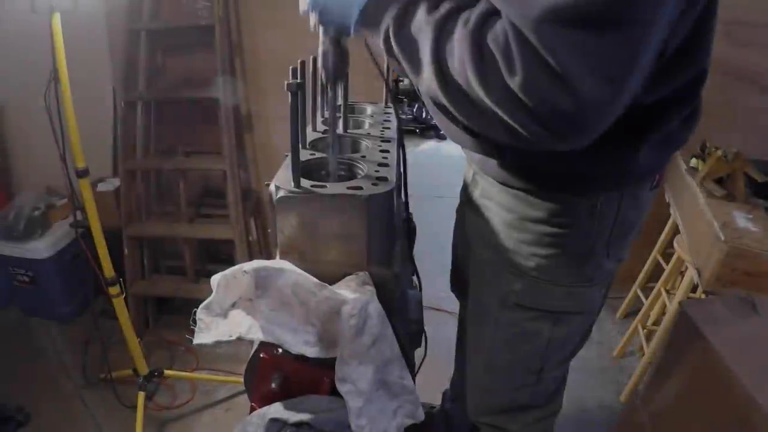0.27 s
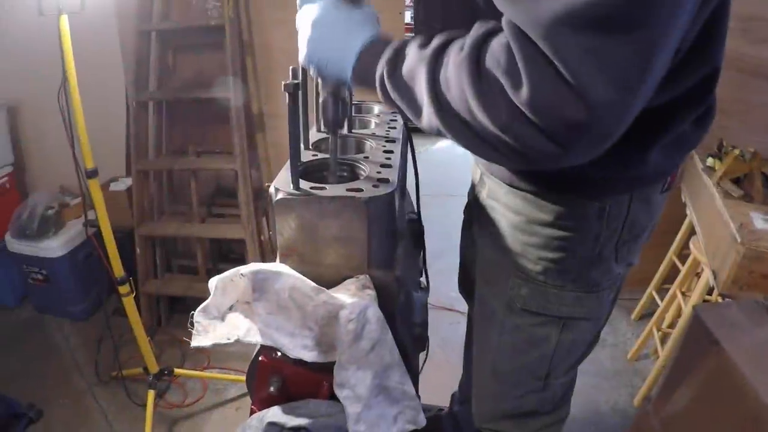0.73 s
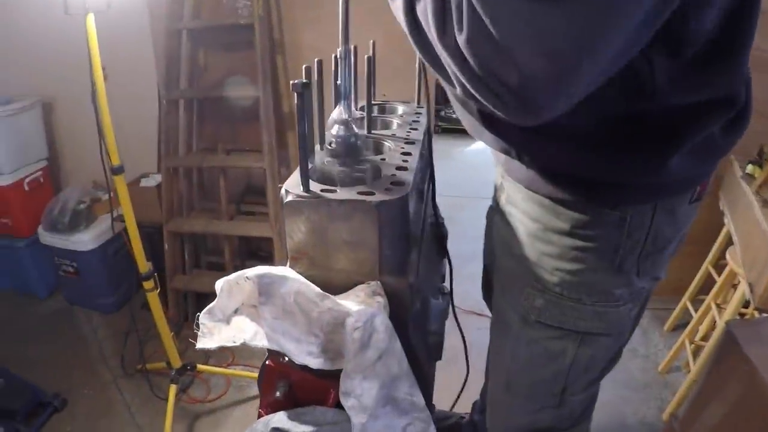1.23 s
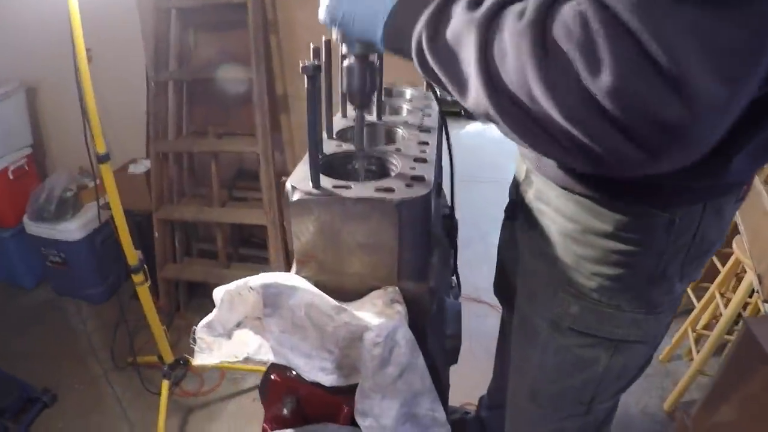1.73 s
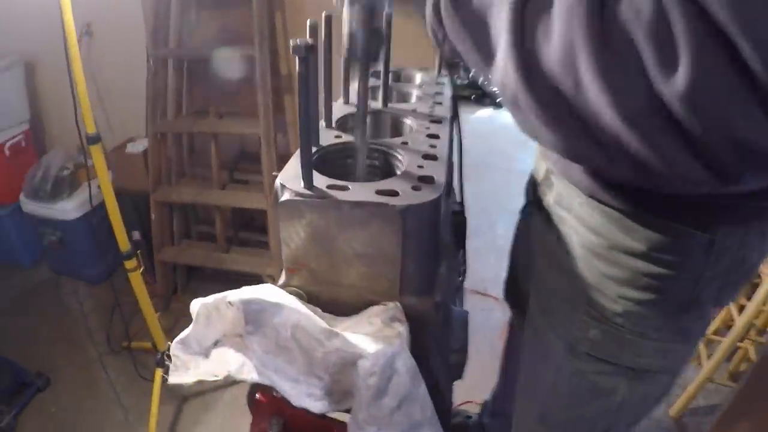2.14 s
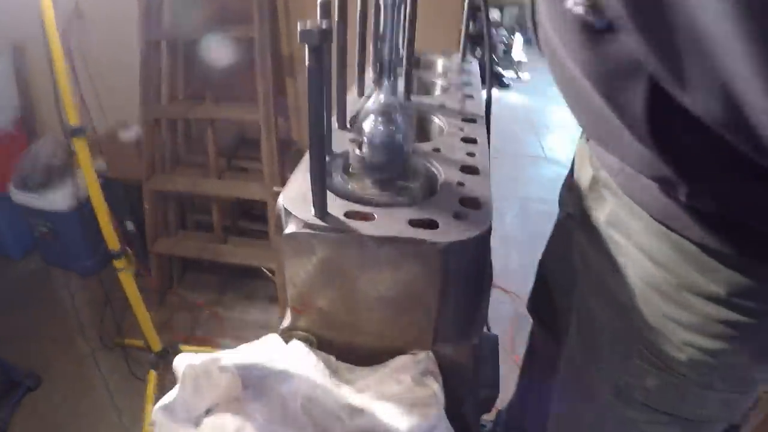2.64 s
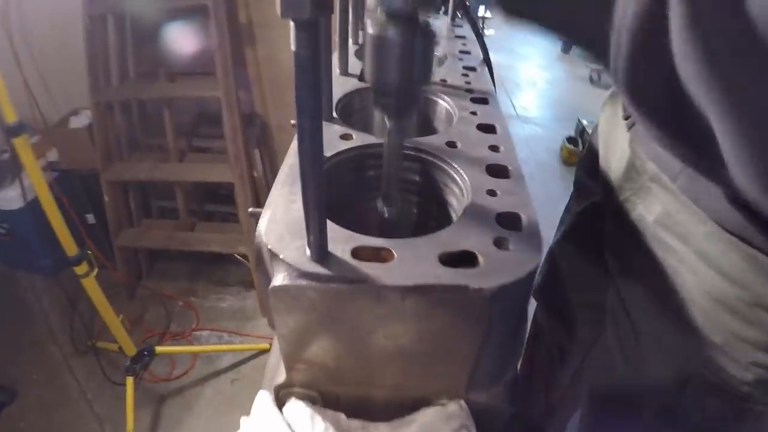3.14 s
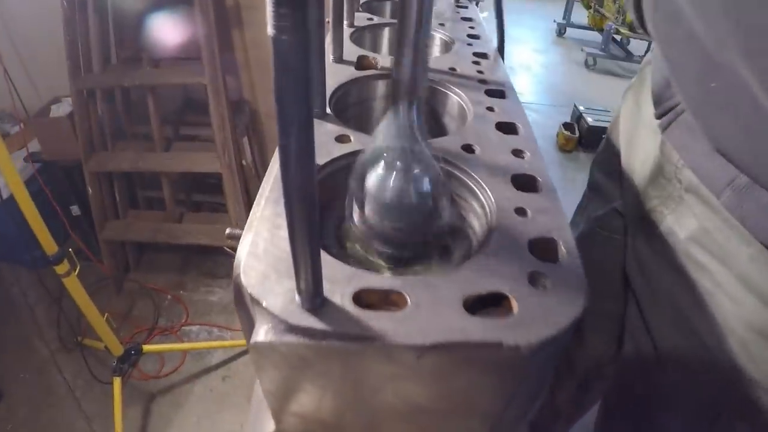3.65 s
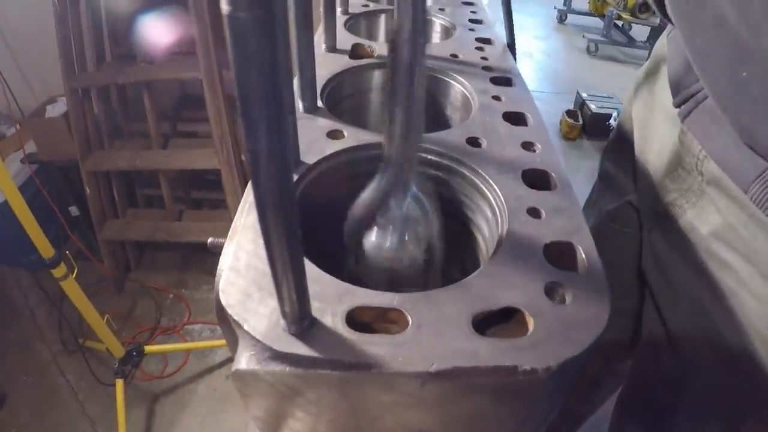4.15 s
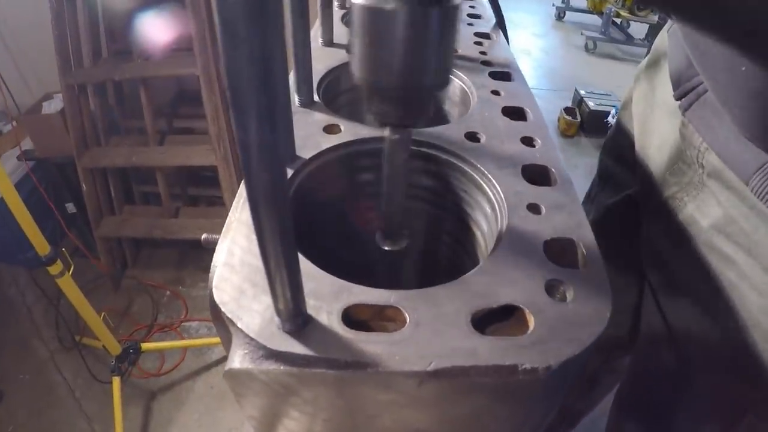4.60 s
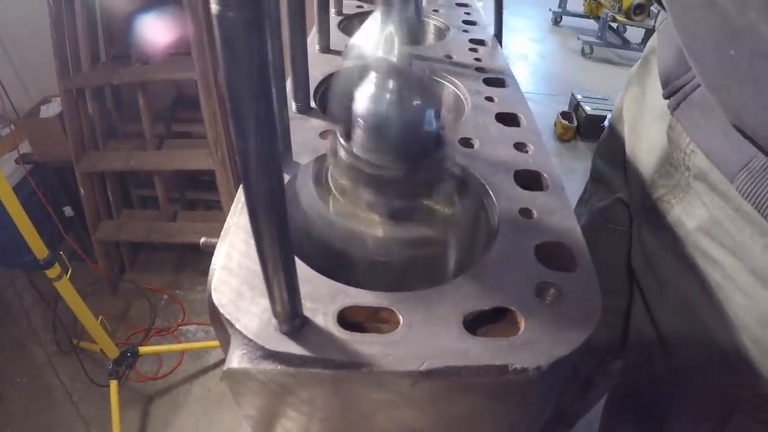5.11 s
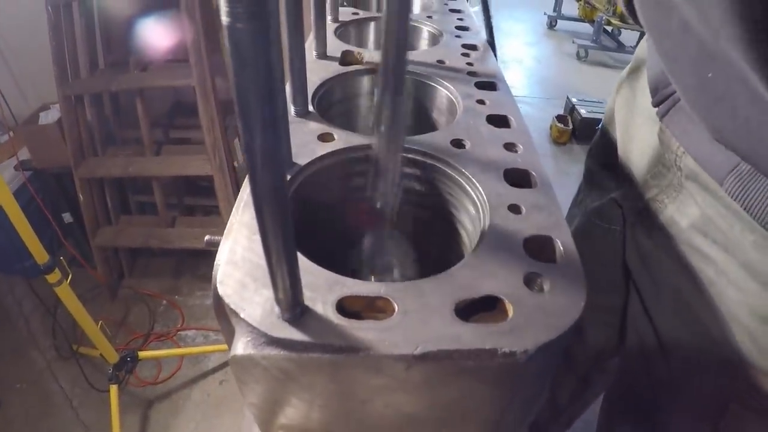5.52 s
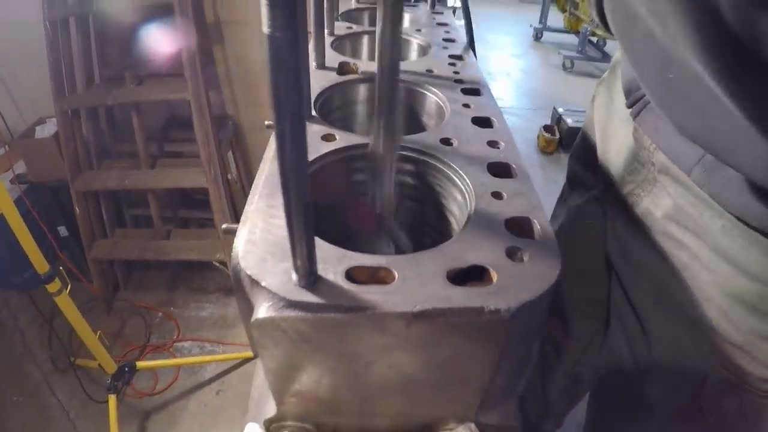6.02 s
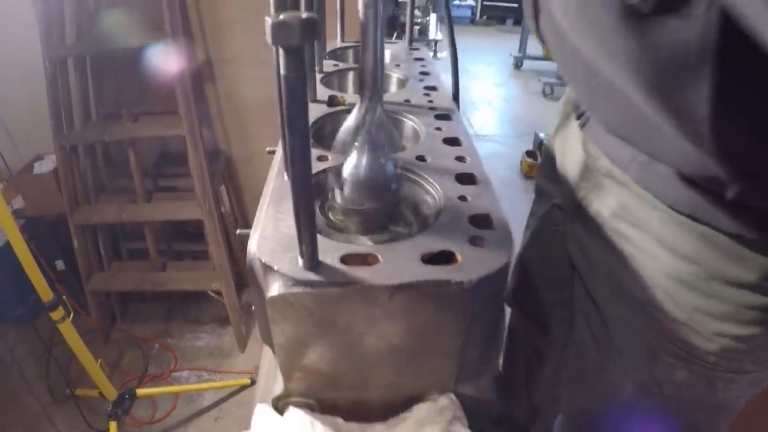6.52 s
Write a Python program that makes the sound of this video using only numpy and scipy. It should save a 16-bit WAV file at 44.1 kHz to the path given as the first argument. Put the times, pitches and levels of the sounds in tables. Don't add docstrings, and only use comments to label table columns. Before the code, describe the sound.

Harsh drill motor and gear whine with steady gritty scraping, sharp high squeaks and low air buffeting, then a tiny silence and brighter drill noise.

```python
import sys
import numpy as np
from scipy import signal
from scipy.fft import rfft, irfft, next_fast_len
from scipy.io import wavfile
from scipy.ndimage import uniform_filter1d, map_coordinates

SR = 44100
rng = np.random.default_rng(int(sys.argv[2]) if len(sys.argv) > 2 else 0)


def transcribe(u):
    v = np.clip(np.atleast_2d(u).T, -1, 1)
    q = np.round(v * 32767).astype(np.int16)
    wavfile.write(sys.argv[1], SR, q)


def level_to_linear(level):
    exponent = np.asarray(level, float) / 20
    return 10 ** exponent


N = 298155

CHUCK, IDLER = 1 / 16.1, 7 / 45.4
# (time [s], level [dB])
NEARNESS = [(0, -7.5), (.3, -0.5), (.7, 0), (1.8, 0), (2.5, 3), (3.3, 4), (5, 3.5), (6.7, 3.5)]
# (time [s], level [dB])
SINKING = [(0, 0.5), (.32, -0.5), (.8, 3), (1.15, 0.5), (1.75, 1), (2.2, 2.5), (2.6, -1.5), (3.05, -1),
           (3.38, 1.5), (3.7, -3), (4.05, -4.5), (4.45, -3), (4.66, 3), (4.96, -4.5), (5.42, -5), (5.92, 3),
           (6.22, -4), (6.68, -3.5)]
# (start [s], end [s], housing level [dB], bore drone level [dB])
BORE_MOUTH = [
    (.42, .66, 5, -0.5),
    (.95, 1.78, 0.5, 5),
    (2.15, 2.4, 1, 7),
    (2.45, 2.85, 6, 7),
    (3.9, 4.15, 8, 2),
    (5.2, 5.35, 5, 2),
    (6.3, 6.8, -3.5, 3),
]
# (start [s], end [s], rumble level [dB], flutter level [dB], vent tone level [dB])
DRAUGHTS = [
    (1.15, 1.3, 5, 1, -1),
    (1.85, 2.2, 3, 3.5, 1.5),
    (2.3, 3.0, 0, 0, -10),
    (3.05, 3.65, 8, 4, .5),
    (4.2, 5.05, 9, 2.5, 3.5),
    (5.55, 6.2, 9.5, 3.5, 4.5),
    (6.55, 6.9, 2, 7.5, 11),
]
DRAUGHT_SWELL_S = 0.45
# (start [s], end [s])
SILENCE = (6.6848, 6.7282)


def unit(x):
    return x / np.sqrt(np.mean(x ** 2) + 1e-20)


def curves(rows):
    s, *cols = np.transpose(rows)
    return [np.interp(np.arange(N) / SR, s, c) for c in cols]


def wobble(rate):
    coarse = np.arange(0, N + 16, 16)
    knots = rng.standard_normal(int(N * rate / SR) + 4)
    return np.interp(np.arange(N), coarse, map_coordinates(knots, [coarse * rate / SR]))


def noise(spectrum, patchy_db, size=next_fast_len(N), scale=1):
    z = signal.stft(rng.standard_normal(size), nperseg=512)[2]
    field = uniform_filter1d(rng.standard_normal(z.shape), size=5, axis=0)
    field = uniform_filter1d(field, size=10, axis=1)
    x = signal.istft(z * level_to_linear(patchy_db * unit(field)), nperseg=512)[1][:size]
    f, db = np.transpose(spectrum)
    hz = np.fft.rfftfreq(size, 1 / SR)
    gain = level_to_linear(np.interp(np.log(hz + 1), np.log(f * scale), db, -120, -120))
    x = unit(irfft(rfft(x) * gain, size))
    return x if scale > 1 else x[:N]


def law(level_db, per_near, per_down):
    return level_db + per_near * curves(NEARNESS)[0] + per_down * curves(SINKING)[0]


def holds(rows, drift=0, swell_s=0.2):
    t = np.arange(0, N + 64, 64) / SR
    total = 0
    for start, end, *cols in rows:
        plateau = np.clip(np.minimum(t - start, end - t) / swell_s + 0.5, 0, 1)
        total = total + plateau * (np.c_[cols] + np.c_[drift] * (t - (start + end) / 2))
    return np.array(curves(np.c_[t, total.T]))


def turns():
    # (time [s], speed [turns/s])
    armature_speed = [(-0.34, 358.2), (0.31, 340.4), (0.78, 367.4), (1.14, 339.4), (1.34, 348.7),
                      (1.61, 331.8), (2.12, 363.9), (2.51, 329.0), (3.0, 321.6), (3.41, 354.6),
                      (3.8, 331.5), (4.27, 328.1), (4.75, 365.9), (5.14, 336.9), (5.62, 335.9),
                      (5.97, 371.6), (6.34, 349.8), (6.42, 358.5)]
    inertia_s = 0.13
    t = np.arange(0, N + 32, 32) / SR
    speed = np.interp(t, *np.transpose(armature_speed))
    speed = uniform_filter1d(speed, int(inertia_s * SR / 32))
    return np.interp(np.arange(N) / SR, t, np.cumsum(speed) * t[1])


def chuck(lead):
    return np.exp(0.87 * np.sin(2 * np.pi * CHUCK * turns() + lead)) - 1.4


def tones(orders, levels_db, flutter_db, beat_db, slip):
    angle = 2 * np.pi * turns()
    out = 0
    for order, db in zip(orders, levels_db):
        level = level_to_linear(db + flutter_db * wobble(14))
        out = out + level * np.sin(order * (angle + slip * wobble(40)))
    return unit(level_to_linear(beat_db * chuck(0.1)) * out)


def motor():
    # (frequency [Hz], level [dB per Hz])
    air_spectrum = [(250, -48), (450, -10), (700, -4.5), (1080, -0.5), (1200, -2), (2000, -2), (3500, -3),
                    (4500, -6.5), (7000, -41)]
    vent_orders = [5, 5 + IDLER, 6 - IDLER, 6, 6 + IDLER, 6.383]
    vent_levels = [-2.5, -13.5, -6.5, 1, 2, 2]
    slot_orders = [12, 16, 20, 24, 28, 35, 13.85, 14.16, 10.58]
    slot_levels = [0.5, -16.5, -28, -11, -31, -22, -9, -10, -12]
    # (time [s], slot tone level [dB])
    slot_facing = [(0, -43), (.48, -31), (.7, -35), (1.3, -32.5), (1.6, -29), (2.1, -28), (2.4, -33.5),
                   (3.08, -24.5), (3.45, -28), (3.72, -37), (4.0, -39.5), (4.6, -26), (4.85, -30),
                   (5.15, -42), (5.45, -35), (5.82, -24), (6.1, -28), (6.68, -33)]
    housing_orders = [3, 2.584, 8.398]
    housing_levels = [3.5, -8.5, -7]

    air_db = law(-35, 0.94, 0.95) + 6.5 + 0.11 * chuck(0.25) + 0.75 * wobble(7)
    vent_db = law(-36.5, 1.1, 2.1) - 1.7 + holds(DRAUGHTS, swell_s=DRAUGHT_SWELL_S)[2]
    slot_db = curves(slot_facing)[0] + 0.4
    housing_db = law(-36, 0.71, 1.3) + 0.3 + holds(BORE_MOUTH)[0]

    air = noise(air_spectrum, patchy_db=1.0)
    vent = tones(vent_orders, vent_levels, flutter_db=2.5, beat_db=0.5, slip=0.081)
    slots = tones(slot_orders, slot_levels, flutter_db=1.8, beat_db=2.4, slip=0.045)
    housing = tones(housing_orders, housing_levels, flutter_db=3.0, beat_db=1.2, slip=0.3)
    return level_to_linear(air_db) * air + level_to_linear(vent_db) * vent + level_to_linear(slot_db) * slots + level_to_linear(housing_db) * housing


def mesh_tone(order, lean_rad, throb, idler_rad, chuck_rad):
    angle = 2 * np.pi * turns()
    bend = idler_rad * np.sin(IDLER / 2 * angle) + chuck_rad * np.sin(CHUCK * angle) + 0.45 * wobble(30)
    height = (-1.5 - curves(SINKING)[0]) / 3.5
    sweep = lean_rad * height * np.sin(IDLER * angle + 2.43 * order)
    size = level_to_linear(1.3 * wobble(12) + 1.4 * chuck(0.3)) * (1 + 2 * throb * np.cos(IDLER * angle + 2.4 * order))
    return unit(size * np.sin(order * angle + bend + sweep))


def rattle(spectrum):
    angle = turns()
    drawn_speed = 350
    laid_out = noise(spectrum, 1.2, size=next_fast_len(N + SR), scale=drawn_speed)
    raw = map_coordinates(laid_out, [angle * SR / drawn_speed], order=1)
    chop_db = 0.6 * np.sin(2 * np.pi * IDLER * angle) + 1.1 * chuck(0.3) + 1.1 * wobble(6)
    return level_to_linear(chop_db) * raw


def gears():
    mesh_orders = [7, 8, 9]
    mesh_modulation = [(.65, .9, .4), (.3, .15, .85), (.12, .1, .8)]
    throb_bend = [.6, .05, .05]
    # (start [s], end [s], mesh [dB], first run-out [dB], second run-out [dB])
    loads = [(.5, 1.0, 0, 5.5, -6), (.74, 1.2, 1.5, .5, 5), (1.38, 1.7, 0, 3, 3), (1.7, 2.35, 0.5, 6, 0),
             (2.4, 2.95, 0, 3.5, 8.5), (3.0, 3.35, 1.5, 2, 1.5), (3.45, 4.38, 2.5, 7, 11.5),
             (4.42, 4.7, 2, -6, -1), (4.73, 5.66, 4.5, 6.5, 10), (5.7, 5.95, 0, -3, -7),
             (6.02, 6.6, 5.5, 6, 6.5)]
    shaft_orders = [1, 1.4, 2]
    shaft_levels = [-7, -2, 0.5]
    # (order [per armature turn], level [dB])
    low_rattle = [(6, -38), (6.65, -5), (6.85, -1.5), (7.4, 1.5), (7.7, -9.5), (8.2, -42)]
    # (order [per armature turn], level [dB])
    high_rattle = [(7.2, -24), (7.7, 2), (8, 2), (8.5, -6), (9.1, -2), (10, -7.5), (12, -44)]

    unloaded_db, drift_db_per_s = [-29, -33, -38.5], [-4, -0.7, 0.5]
    levels_db = np.c_[unloaded_db] + curves(NEARNESS)[0] + holds(loads, drift_db_per_s)
    out = level_to_linear(levels_db[0] - 3.0) * rattle(low_rattle) + level_to_linear(levels_db[1] - 1.5) * rattle(high_rattle)
    for db, order, lean_rad, modulation in zip(levels_db, mesh_orders, throb_bend, mesh_modulation):
        out += level_to_linear(db - 2.2) * mesh_tone(order, lean_rad, *modulation)
    third_orders = [3 * mesh_orders[0], mesh_orders[2] + 1]
    third = tones(third_orders, [0, -2.5], flutter_db=-4.5, beat_db=3.5, slip=0.081)
    shaft = tones(shaft_orders, shaft_levels, flutter_db=5.5, beat_db=2.3, slip=0.15)
    return out + level_to_linear(levels_db[2] - 12.5) * third + level_to_linear(levels_db[0] - 23.5) * shaft


def hone():
    # (frequency [Hz], level [dB per Hz])
    rasp_spectrum = [(2500, -22), (3600, -11), (4400, -1), (4800, -1.5), (5200, 3), (5700, -3.5),
                     (7000, -7), (9200, -9), (10000, -8), (10700, -13.5), (11500, -29)]
    # (frequency [Hz], level [dB per Hz])
    grit_spectrum = [(9000, -43), (10500, 0.5), (12000, 0), (15300, -5)]
    # (frequency [Hz], level [dB per Hz])
    bore_spectrum = [(600, -35), (780, -3), (900, 0), (1000, 1.5), (1150, -30)]
    press = chuck(0.61) + 0.37 * wobble(9.1)
    rasp_db = law(-25.5, 0.71, 0.46) + 0.5 + 0.63 * press
    grit_db = law(-40, 1, 0.3) + 2.5 + 0.68 * press
    bore_db = law(-37, 0.22, 0.22) - 1.5 + holds(BORE_MOUTH)[1] + 0.68 * press
    grains = level_to_linear(1.03 * wobble(900))
    rasp = level_to_linear(rasp_db) * unit(grains * noise(rasp_spectrum, patchy_db=1.34))
    grit = level_to_linear(grit_db) * noise(grit_spectrum, patchy_db=1.0)
    return rasp + grit + level_to_linear(bore_db) * noise(bore_spectrum, patchy_db=0.2)


def buffet():
    # (frequency [Hz], level [dB per Hz])
    rumble_spectrum = [(10, -33), (20, 2), (30, -3.5), (50, -5.5), (120, -12.5), (200, -28)]
    # (frequency [Hz], level [dB per Hz])
    flutter_spectrum = [(90, -18), (150, 2.5), (300, -0.5), (480, 0), (650, -3.5)]
    # (time [s], level [dB], frequency [Hz], 60 dB decay time [s])
    bumps = [
        (.68, -34.5, 189, 0.36),
        (1.16, -31, 315, 0.25),
        (2.135, -23, 41.8, .16),
        (2.47, -33, 300, 0.21),
        (6.3, -34, 317, 0.29),
    ]
    gust_rumble_db, gust_flutter_db, _ = holds(DRAUGHTS, swell_s=DRAUGHT_SWELL_S)
    rumble_db = law(-51.5, 1.56, 0.2) + gust_rumble_db
    flutter_db = law(-48, 1, 0.47) - 0.1 + gust_flutter_db
    out = level_to_linear(rumble_db) * unit(level_to_linear(1.5 * wobble(15)) * noise(rumble_spectrum, patchy_db=1.1))
    out += level_to_linear(flutter_db) * noise(flutter_spectrum, patchy_db=1.5)
    for s, db, hz, t60 in bumps:
        t = np.clip(np.arange(N) / SR - s, 0, None)
        onset = 1 - np.exp(-t / 0.01)
        out += level_to_linear(db - 60 * t / t60) * onset * np.sin(2 * np.pi * hz * t)
    return out


def slips():
    # (time [s], level [dB], frequency [Hz], length [s])
    hard_slips = [(1.35, -9.5, 10600, 0.0064), (1.4574, -17, 10550, 0.0072), (1.525, -16, 10500, 0.0072),
                  (1.5825, -22, 10700, 0.0063), (1.6571, -12.5, 10640, 0.0072),
                  (1.7324, -13.5, 10600, 0.0077), (2.6923, -13, 10570, 0.0068),
                  (2.7387, -13, 10600, 0.0072), (2.7847, -16, 10800, 0.0072), (2.8739, -10, 10490, 0.0072),
                  (2.9307, -14, 10660, 0.0066), (3.0104, -13, 10500, 0.0072), (3.4476, -19, 10500, 0.0072),
                  (4.0124, -8, 10500, 0.0072), (4.3026, -16, 10800, 0.0072), (4.366, -15, 10500, 0.0066),
                  (4.3834, -9, 10400, 0.0085), (5.0789, -17, 10600, 0.0072), (5.178, -15, 10460, 0.0072),
                  (5.22, -10, 10680, 0.0072), (5.3188, -9, 10600, 0.0072), (5.353, -8, 10640, 0.0072),
                  (5.4024, -11.5, 10600, 0.0072), (5.497, -12.5, 10600, 0.0072),
                  (5.6384, -17, 10600, 0.0072), (5.661, -17, 10500, 0.0072), (6.4438, -11, 10600, 0.0065),
                  (6.5385, -8.5, 10700, 0.0072), (6.5809, -10.5, 10600, 0.0068),
                  (6.6677, -14.5, 10750, 0.0072)]
    # (first time [s], gap [s], level [dB], count [slips])
    light_runs = [
        (.035, 0.043, -20, 10),
        (1.366, 0.038, -20, 9),
        (2.684, 0.039, -21, 10),
        (3.70, .033, -23, 2),
        (3.886, .0445, -15, 3),
        (4.066, 0.05, -11, 5),
        (5.088, 0.042, -25, 11),
        (6.416, 0.046, -22, 5),
    ]
    peak_s = 0.0025
    events = [(s + peak_s, *rest) for s, *rest in hard_slips]
    for first, gap, db, count in light_runs:
        for k in range(round(count)):
            late, size, pitch, stretch = rng.standard_normal(4)
            s = first + k * gap + 0.003 * late
            events.append((s, db + 1.8 * size, 10630 + 70 * pitch, 0.0072 * level_to_linear(2 * stretch)))
    return events


def squeaks():
    out = np.zeros(N + SR, complex)
    t = np.arange(-SR // 40, SR // 20) / SR
    for s, db, hz, length in slips():
        phase, fall = rng.standard_normal(2)
        shape = np.exp(-np.abs(1.67 * t / length) ** 1.8)
        after = (t > 0) * level_to_linear(-12 - 60 * t / 0.06) * (1 - shape)
        cycle = np.exp(2j * np.pi * (hz * t - (5000 + 5000 * fall) * t ** 2 + phase))
        out[round(s * SR):][:len(t)] += level_to_linear(db + 0.1) * (shape - after) * cycle
    hoarse = level_to_linear(1.5 * wobble(500)) * np.exp(0.8j * wobble(350))
    return (out[SR // 40:][:N] * hoarse).real


def shop(x):
    t = np.arange(SR // 4) / SR
    tail = rng.standard_normal(len(t)) * level_to_linear(-60 * t / 0.21) * (t > 0.003)
    return signal.fftconvolve(x, tail / np.linalg.norm(tail))[:N]


def other_angle():
    # (frequency [Hz], level [dB per Hz])
    side_spectrum = [(18, -30), (30, -5), (407, -19), (989, -11), (1250, -13), (2050, -3.5), (2600, -3),
                     (5120, -10), (15300, -26)]
    # (frequency [Hz], level [dB])
    side_tones = [(980, -28), (2105, -26), (3225, -24), (3560, -23), (5190, -23)]
    t = np.arange(N) / SR - SILENCE[1]
    drill = level_to_linear(-18) * noise(side_spectrum, patchy_db=1.0)
    for hz, db in side_tones:
        drill += level_to_linear(db + 3 * wobble(150)) * np.sin(2 * np.pi * hz * t + wobble(200))
    jolt = -level_to_linear(-15) * np.sin(2 * np.pi * 60 * t) * level_to_linear(-60 * np.abs(t) / 0.035)
    rise = np.clip(0.72 + t / 0.009, 0, 1)
    return np.clip(t / 0.0004, 0, 1) * (jolt + rise * drill)


def scene():
    tremble = level_to_linear(0.36 * wobble(13))
    squeal = squeaks()
    mono = (motor() + gears() + hone()) * tremble + buffet()
    mono += squeal + level_to_linear(-6) * shop(squeal)
    mono *= np.clip((SILENCE[0] - np.arange(N) / SR) / 0.00038, 0, 1)
    mono += other_angle()
    return np.array([mono, mono])


def top_cut(x):
    return signal.sosfilt(signal.butter(12, 16290, fs=SR, output="sos"), x)


def record(dry):
    hz = np.fft.rfftfreq(N, 1 / SR)
    mix = irfft(rfft(dry) * (hz < 15330), N)
    return top_cut(mix)


dry = scene()
out = record(dry)
transcribe(out)
```